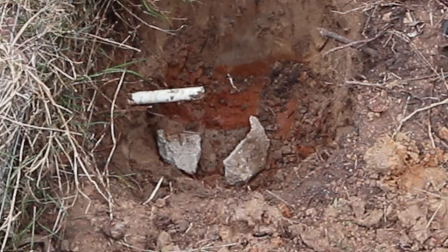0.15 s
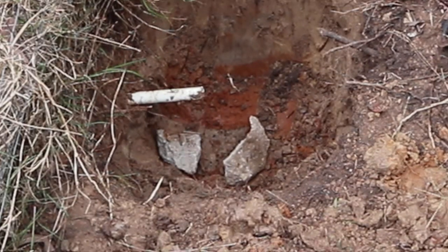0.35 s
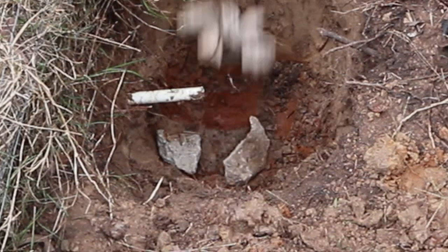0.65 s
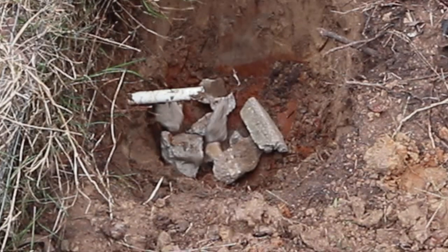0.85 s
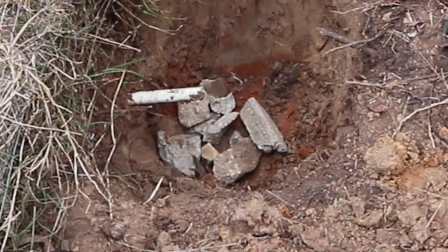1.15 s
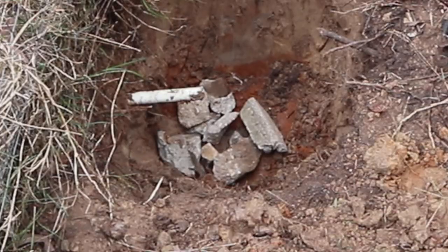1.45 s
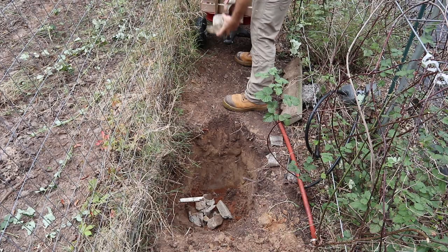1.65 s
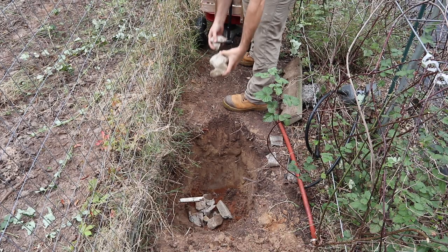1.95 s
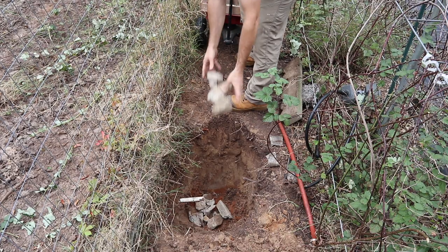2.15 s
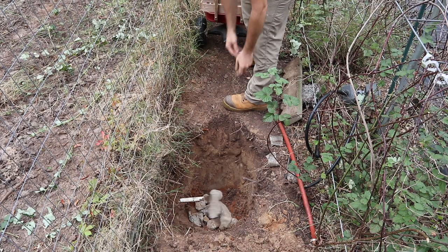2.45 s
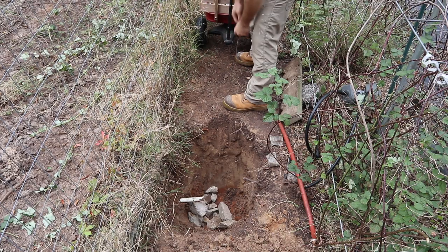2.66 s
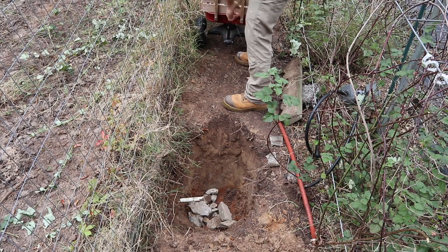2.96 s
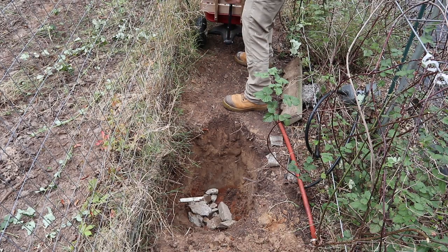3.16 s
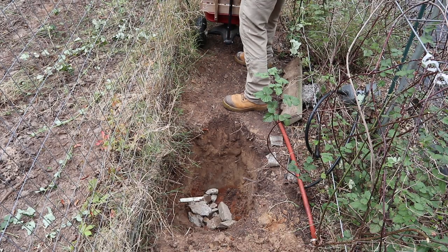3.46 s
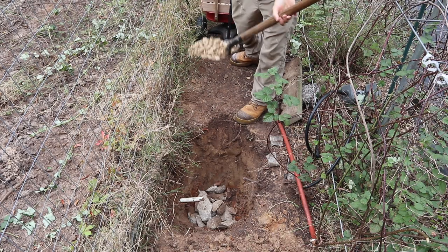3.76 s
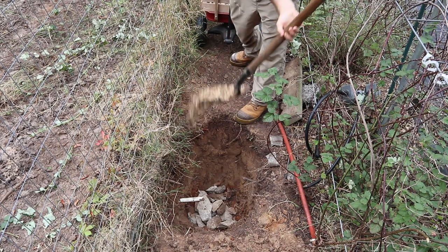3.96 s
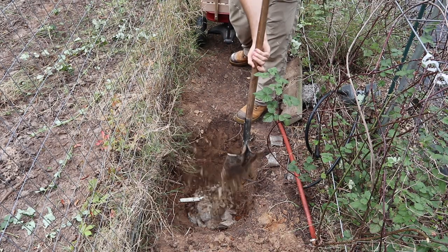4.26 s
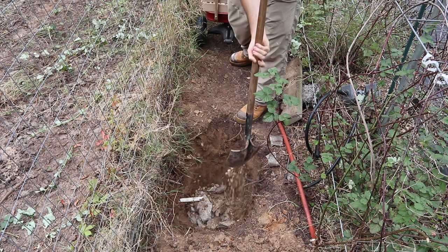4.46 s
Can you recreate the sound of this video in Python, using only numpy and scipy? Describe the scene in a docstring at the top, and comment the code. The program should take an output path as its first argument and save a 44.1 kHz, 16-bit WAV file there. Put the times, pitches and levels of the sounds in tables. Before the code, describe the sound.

Rocks clatter hard into a dug hole in two bursts, then a shovelful of gravel rattles and hisses down, with birds whistling outdoors.

```python
"""Rocks and gravel tipped into a dug hole

Two armfuls of rocks drop on rubble: each blow is shaped noise bursts and pushes, and some stones ring.
A shovel then scoops and tips gravel, made of countless short pebble rings and fine ticks.
Birds whistle in gliding sines with echoes among trees, over a faint hush of filtered noise."""
import sys
import numpy as np
from scipy import signal
from scipy.io import wavfile

SR = 44100
rng = np.random.default_rng(int(sys.argv[2]) if len(sys.argv) > 2 else 0)


def generate_wav(sig):
    """Save sig (samples, or channels by samples) to the path in sys.argv[1] as 16-bit PCM at SR."""
    pcm = np.round(np.clip(np.atleast_2d(sig).T, -1, 1) * 32767).astype(np.int16)
    wavfile.write(sys.argv[1], SR, pcm)


N = 202639
TIME = np.arange(N) / SR

# Resonances of the air in the hole and between the rocks.
# Each row: centre in Hz, level in dB, width in Hz.
HOLE_MODES = [(151, -2, 15), (252, -2.5, 26), (306, -3.5, 61), (430, -8.5, 83), (544, -5.5, 55),
              (696, -5.5, 52), (890, -1, 110), (1190, -11.5, 43), (1440, -10.5, 32), (1720, -8, 47)]
# Tone of fine grit. Each row: frequency in Hz, relative level in dB per Hz.
GRIT_TONE = [(2000, -23.5), (4000, -11.5), (5600, -2.5), (6900, -7), (8500, 3), (10300, -10), (12800, -0.5),
             (16000, -13)]


def amp(db):
    """Decibels to gain."""
    return 10 ** (np.asarray(db) / 20)


def unit(x):
    """Scales to an rms of one."""
    return x / np.sqrt(np.mean(x ** 2) + 1e-20)


def add(mix, s, sound):
    """Mixes a sound in at a time in seconds."""
    part = mix[max(round(s * SR), 0):][:len(sound)]
    part += sound[:len(part)]


def colour(x, points, scale=1, size=4096):
    """Minimum-phase filter through (Hz, dB) points: nothing sounds before a blow."""
    hz, db = np.transpose(points)
    hz = hz * scale
    f = abs(np.fft.fftfreq(size, 1 / SR)) + 1
    # past the outer points the gain falls by 10 dB per octave
    octaves_below = np.maximum(np.log2(hz[0] / f), 0)
    octaves_above = np.maximum(np.log2(f / hz[-1]), 0)
    gain_db = np.interp(np.log(f), np.log(hz), db) - 10 * (octaves_below + octaves_above)
    log_gain = np.log(amp(gain_db))
    # the Hilbert transform of the log gain gives the causal phase
    taps = np.fft.ifft(np.exp(signal.hilbert(log_gain).conj())).real
    return signal.oaconvolve(x, taps[:size // 2])[:len(x)]


def dying(t, t60):
    """Exponential decay that falls by 60 dB in t60 seconds."""
    return np.exp(-np.log(1000) * t / t60)


def struck(x, db, count):
    """Sets the rms of the first count samples of a blow."""
    return amp(db) * x / np.sqrt(np.mean(x[:count] ** 2) + 1e-20)


def swells(rows):
    """Brief bell-shaped rises in level."""
    return sum(amp(db) * np.exp(-((TIME - s) / length) ** 2) for s, db, length in rows)


def hollow(x, modes):
    """What a set of resonances adds to a sound."""
    out = 0
    for hz, db, width in modes:
        out = out + amp(db) * signal.lfilter(*signal.iirpeak(hz, hz / width, fs=SR), x)
    return out


def space(x, t60, gap, tone):
    """Scattered echoes: sparse taps of random sign that start after a gap and die away."""
    t = np.arange(SR) / SR
    signs = rng.choice([-1., 1.], SR)
    taps = signs * (rng.random(SR) < 1 / 10) * (t > gap) * dying(t, t60)
    taps = colour(taps, tone)
    return signal.oaconvolve(x, taps / np.linalg.norm(taps))[:N]


def contact(t, t60, crumble, seat=.0005):
    """Rough faces graze, seat with one hard push, and crunch briefly."""
    crunch = crumble * rng.standard_normal(len(t)) * dying(t, t60) * np.minimum(t / seat, 1)
    push = np.sinc((t - seat) * SR)
    return crunch + push


def blow(clack_db, clack_hz, crack_db, thud_db):
    """A rock's recoil clacks, its edge cracks and the ground thuds."""
    # Tone of the recoil. Each row: multiple of the clack pitch, relative level in dB.
    clack_tone = [(.12, -25.5), (.3, -10), (.55, -2.5), (1, 1), (1.5, -5.5), (2.4, -14.5), (4, -31),
                  (8, -54)]
    # Tone of the breaking edge. Each row: frequency in Hz, relative level in dB per Hz.
    crack_tone = [(2500, -26.5), (4500, -1), (6500, -5), (8500, 2), (10500, -10.5), (13500, -6.5),
                  (16000, -14.5)]
    # Tone of the shaken ground. Each row: frequency in Hz, relative level in dB per Hz.
    thud_tone = [(30, -32), (90, -18.5), (160, -0.5), (240, -2), (330, -2), (480, -14.5), (900, -35)]
    t = np.arange(SR // 6) / SR
    clack = colour(contact(t, t60=.019, crumble=0.21), clack_tone, clack_hz)
    crack = colour(contact(t, t60=0.013, crumble=0.3), crack_tone)
    thud = colour(contact(t, t60=0.053, crumble=0.049), thud_tone)
    # chips and dust patter down after the blow
    chips = rng.standard_normal(len(t)) * (rng.random(len(t)) < 1500 / SR) * dying(t, t60=0.094)
    chips = colour(chips, crack_tone)
    hard = struck(clack, clack_db, count=176) + struck(crack, crack_db, count=176)
    return hard + struck(thud, thud_db - 4.5, count=352) + struck(chips, crack_db - 22.5, count=882)


def ring(modes):
    """The high, short tink of a small solid stone: a few decaying sines."""
    t = np.arange(SR // 6) / SR
    out = np.zeros(len(t))
    for hz, db, t60 in modes:
        out += amp(db) * np.sqrt(2) * np.sin(2 * np.pi * hz * t) * dying(t, t60)
    return out


def knocks():
    """Small stones tumble after each armful, ever more softly: rows for blow() with a start."""
    # The two spells of settling. Each row: start in seconds, length in seconds, first level in dB.
    settling = [(.805, .56, -51.5), (2.527, .2, -46.5)]
    knocks_per_s, fade_db_per_s, centre_hz = 20, 36, 1700
    rows = []
    for start, length, db in settling:
        for k, (when, size, pitch) in enumerate(rng.random((30, 3))):
            age = (k + when) / knocks_per_s
            level = db - fade_db_per_s * age + 8 * (size - .5)
            hz = centre_hz * 2 ** (pitch - .5)
            if age < length:
                rows.append((start + age, level, hz, level - 9, level - 6.5))
    return rows


def pebble_strikes():
    """Pebbles are alike in size, so they clack near one pitch and hardly shake the earth."""
    # Single pebbles hit the blade, each other and the rocks.
    # Each row: start in seconds, clack level in dB, crack level in dB.
    strikes = [(3.708, -40, -31.5), (3.742, -28.5, -33.5), (3.768, -25.5, -38.5), (3.815, -22.5, -42),
               (3.897, -22, -35), (3.901, -28, -40), (3.962, -25, -31), (3.966, -25, -33),
               (3.997, -29, -29.5), (4.014, -21, -23.5), (4.04, -17.5, -18), (4.046, -19.5, -19),
               (4.067, -34, -15.5), (4.087, -20, -20), (4.095, -23.5, -13.5), (4.14, -30.5, -23.5),
               (4.129, -39, -24), (4.188, -37.5, -19), (4.205, -41, -20), (4.214, -40, -25),
               (4.232, -22, -23), (4.257, -26, -15), (4.282, -32, -20), (4.289, -24, -14.5),
               (4.396, -38, -19.5), (4.413, -34, -24), (4.583, -27, -23)]
    centre_hz, spread_octaves = 3400, 0.072
    pitches = centre_hz * 2 ** (spread_octaves * rng.standard_normal(len(strikes)))
    rows = []
    for (s, clack_db, crack_db), hz in zip(strikes, pitches):
        rows.append((s, clack_db, hz, crack_db, clack_db - 29))
    return rows


def rocks():
    """All the blows and rings, with the short answer of the earth walls and a faint one of the trees."""
    # The main blows of rock on rock. Each row: start in seconds, clack level in dB, clack pitch in Hz,
    # crack level in dB, thud level in dB ahead of the 4.5 dB cut in blow().
    main_blows = [(.776, -2, 1590, -7, -18), (.7802, -10.5, 1190, -32, -21),
                  (0.784, -15, 2600, -22.5, -35.5), (0.7916, -16.5, 3210, -18.5, -35),
                  (0.7965, -18.5, 2130, -27, -20.5), (0.8059, -13, 1750, -42, -31.5),
                  (0.8137, -49, 1510, -45, -43), (.8437, -18.5, 2180, -56.5, -55),
                  (.854, -21.5, 1900, -46, -46), (0.8838, -49, 2130, -55, -57), (.906, -38, 1930, -51, -70),
                  (.9128, -49, 2000, -45, -64), (0.939, -31.5, 1740, -57, -58.5),
                  (.961, -36.5, 1224, -61, -60), (.982, -37.5, 2260, -48.5, -62),
                  (1.104, -43, 1300, -58, -52.5), (1.119, -50, 1870, -52, -60.5),
                  (1.183, -35.5, 1850, -50, -48.5), (1.189, -43, 1750, -61, -62),
                  (1.221, -45, 1350, -62, -58), (1.233, -37, 1250, -66, -65),
                  (1.2979, -55.5, 1870, -56.5, -60.5), (2.5044, -12, 1500, -28, -30.5),
                  (2.5101, -11, 2340, -25, -32), (2.5169, -1.5, 1778, -15.5, -19),
                  (2.5212, -9, 1190, -24, -18.5), (2.562, -40, 1730, -56, -44.5),
                  (2.587, -34.5, 2370, -60, -60), (2.612, -31, 1120, -52.5, -39.5),
                  (2.626, -44, 1320, -53.5, -51), (2.693, -47.5, 1137, -60, -72.5),
                  (2.701, -45, 2300, -49.5, -68), (2.839, -53, 1303, -76, -52.5),
                  (2.8589, -31, 1360, -45.5, -51), (2.864, -42.5, 1327, -53, -47.5),
                  (2.915, -56.5, 1320, -72, -60)]
    # Solid stones that ring. Each row: the stone's modes (pitch in Hz, level in dB, t60 in seconds),
    # then its strikes (start in seconds, gain in dB).
    ringing_stones = [([(9110, -2, 0.03), (11900, -11, 0.022), (14220, -11, .018)], [(.7885, -23),
                      (.801, -26), (.8445, -33), (.856, -29.5)]), ([(9150, -4, 0.03), (11790, -7, 0.026),
                      (14220, 3.5, 0.024)], [(1.183, -29.5), (1.233, -52), (1.2985, -55.5)]),
                      ([(8220, -1, 0.017), (8770, -4.5, 0.021), (13200, -8.5, .012)], [(.778, -22),
                      (.7965, -26), (.9395, -38), (.9615, -44), (1.206, -57), (2.5103, -27),
                      (2.5185, -15.5), (2.604, -49), (2.626, -49), (2.692, -49)]), ([(5945, 4, 0.063),
                      (5860, 1, 0.053), (5770, -5, 0.094), (12750, -20, .05)], [(4.214, -17), (4.228, -30),
                      (4.243, -18.5)]), ([(10830, 4, 0.044)], [(4.374, -26), (4.394, -21.5)])]
    # One low push lies beneath the first blow. # Each row: start in seconds, peak level in dB, length in
    # seconds.
    pushes = [(.7778, -19, .001)]
    direct = np.zeros(N)
    for s, *row in main_blows + knocks() + pebble_strikes():
        add(direct, s, blow(*row))
    for modes, hits in ringing_stones:
        for s, db in hits:
            add(direct, s, amp(db) * ring(modes))
    wall_tone = [(120, -0.5), (300, 3.5), (1500, -2.5), (5000, -3.5), (15000, -3)]
    tree_tone = [(150, 0.5), (1800, -4), (6000, -7.5), (15000, -13.5)]
    walls = space(direct, t60=0.048, gap=.003, tone=wall_tone)
    trees = space(direct, t60=0.4, gap=0.013, tone=tree_tone)
    answer = amp(-4.5) * hollow(direct, HOLE_MODES) + amp(-22.0) * walls + amp(-46.5) * trees
    return direct + swells(pushes) + answer


def slides():
    """Stone grinds over stone and soil in a run of tiny slips."""
    # Rocks slide a little as they settle. Each row: centre in seconds, peak level in dB, length in seconds.
    slide_moments = [(.951, -48, 0.0075), (1.018, -59.5, 0.011), (1.15, -56.5, 0.016),
                     (1.205, -56.5, 0.025), (2.568, -46.5, 0.0053), (2.622, -52, 0.021), (2.85, -54, 0.014),
                     (2.895, -58, 0.0079)]
    # Tone of the grinding. Each row: frequency in Hz, relative level in dB per Hz.
    scrape_tone = [(100, -6), (200, 4), (500, -1.5), (900, 3), (1800, -6.5), (4000, -25.5), (8500, -20),
                   (15000, -24.5)]
    slips = rng.standard_normal(N) * (rng.random(N) < 1800 / SR)
    return swells(slide_moments) * unit(colour(slips, scrape_tone))


def grains(per_s, spread_db, lo_hz, hi_hz, cycles, count=36):
    """Countless small collisions, each a brief ring at the pitch of its own pebble."""
    out, t = np.zeros(N), np.arange(SR // 50) / SR
    for hz in np.geomspace(lo_hz, min(hi_hz, SR / 2.2), count):
        sizes = amp(spread_db * np.minimum(rng.exponential(1, N), 3.5)) * rng.choice([-1, 1], N)
        hits = sizes * (rng.random(N) < per_s / count / SR)
        # each ring falls by 60 dB within the given number of cycles
        ping = np.sin(2 * np.pi * hz * t) * dying(t, cycles / hz)
        out += np.sqrt(hz) * signal.oaconvolve(hits, unit(ping))[:N]
    return out


def clumps(per_s, t60, depth):
    """Stones collide in little bunches: the level jumps at random moments and dies quickly."""
    jumps = rng.exponential(1, N) * (rng.random(N) < per_s / SR)
    decay = dying(np.arange(SR // 20) / SR, t60)
    return unit(1 + depth * signal.oaconvolve(np.minimum(jumps, 3), decay)[:N])


def gravel():
    """Pebbles clack, grit sizzles and the ground rumbles as the load is scooped and poured."""
    # Flow of the gravel as it is scooped, tossed and lands. Each row: time in seconds, then levels in dB
    # of pebbles, grit and shaken earth, ahead of small trims.
    flow = [(3.6, -67.5, -67.5, -66), (3.718, -37.5, -46.5, -59), (3.81, -29.0, -33.5, -56),
            (3.92, -34, -39, -58.0), (3.995, -43.5, -40, -59), (4.022, -29.5, -28.5, -38.5),
            (4.09, -33.5, -28, -40), (4.115, -51, -24.5, -55), (4.146, -39.5, -23, -53.0),
            (4.187, -45, -32.0, -54), (4.215, -33.5, -15.5, -48), (4.294, -26, -19.0, -52),
            (4.311, -32.5, -22, -52.5), (4.52, -40, -20.5, -51.0), (4.551, -47.5, -29, -62),
            (4.59, -35, -22, -52)]
    # The load leaves the blade: start and end in seconds.
    pour = (3.87, 4.19)
    # Tone of the pebbles. Each row: frequency in Hz, relative level in dB per Hz.
    pebble_tone = [(250, -24), (600, -10), (1000, -5.5), (2200, -1.5), (3500, -0.5), (5000, -2.5),
                   (8000, -23)]
    # Tone of the shaken earth. Each row: frequency in Hz, relative level in dB per Hz.
    earth_tone = [(40, -30.5), (80, -14.5), (140, -2.5), (300, 0), (550, -1.5), (1000, -10)]
    # Grit heard through the heap. Each row: frequency in Hz, gain in dB.
    buried_tone = [(3000, 3), (6000, 4), (9000, -3), (11000, -5.5), (16000, -10.5)]
    # Resonances of the loaded blade. Each row: centre in Hz, level in dB, width in Hz.
    blade_modes = [(635, -1, 70), (1110, 0.5, 96), (1850, 0, 270), (2420, -3.5, 220), (4763, -7.5, 1890)]
    s, *levels = np.transpose(flow)
    pebble_db, grit_db, earth_db = (np.interp(TIME, s, level, left=-120) for level in levels)
    free = np.interp(TIME, pour, (0, 1))

    small = unit(grains(per_s=2700, spread_db=3.5, lo_hz=467.5, hi_hz=7300, cycles=6))
    # larger pebbles knock with long rings at their own pitch
    large = unit(grains(per_s=470, spread_db=2.0, lo_hz=840, hi_hz=2966, cycles=59))
    pebbles = colour(small + amp(-5.0) * large, pebble_tone)
    # the pebbles sound through the blade, then in the hole
    on_blade = amp(-3.5) * pebbles + hollow(pebbles, blade_modes)
    in_hole = pebbles + amp(-3.0) * hollow(pebbles, HOLE_MODES)
    pebbles = free * unit(in_hole) + (1 - free) * unit(on_blade)

    grit = colour(grains(per_s=5700, spread_db=3.0, lo_hz=2900, hi_hz=15500, cycles=14), GRIT_TONE)
    tick_sizes = amp(4.6 * np.minimum(rng.exponential(1, N), 3))
    ticks = colour(tick_sizes * (rng.random(N) < 450 / SR), GRIT_TONE)
    fine = amp(-2.5) * unit(grit) + amp(-9.0) * unit(ticks)
    # grit is muffled inside the heap and bright once it flies free
    fine = free * fine + (1 - free) * colour(fine, buried_tone)

    earth = unit(colour(rng.standard_normal(N), earth_tone))
    bunched = clumps(per_s=200, t60=0.014, depth=0.37)
    pebbles = amp(pebble_db + 0.17) * pebbles * bunched
    fine = amp(grit_db + 0.53) * fine * unit(bunched ** 0.52)  # grit bunches less
    return pebbles + fine + amp(earth_db + 0.3) * earth


def steps():
    """Dull thumps of a boot: a soft contact coloured by packed soil."""
    # A boot comes down, heel then sole. Each row: start in seconds, level in dB.
    footfalls = [(4.025, -44.5), (4.093, -44.5)]
    # Tone of the boot on soil. Each row: frequency in Hz, relative level in dB per Hz.
    boot_tone = [(30, -11), (70, -11), (130, 5.5), (200, -23), (400, -4), (1000, -44)]
    out, t = np.zeros(N), np.arange(SR // 6) / SR
    for s, db in footfalls:
        thump = colour(contact(t, t60=0.041, crumble=0.019), boot_tone)
        add(out, s, struck(thump, db, count=600))
    return out


def whistles(syllables):
    """Nearly pure notes that swell and fade along a curved glide; those within the trill warble."""
    # The warble: start and end in seconds, rate per second, depth in Hz.
    trill = (2.16, 2.243, 72, 190)
    out, (start, stop, per_s, depth_hz) = np.zeros(N), trill
    for s, length, first, middle, last, db in syllables:
        u = np.linspace(0, 1, round(length * SR))
        t = s + u * length
        pitch = np.polyval(np.polyfit([0, .5, 1], [first, middle, last], 2), u)
        pitch += depth_hz * np.sin(2 * np.pi * per_s * (t - start)) * (t > start) * (t < stop)
        note = np.sqrt(2) * np.sin(2 * np.pi * np.cumsum(pitch) / SR)
        arch = abs(np.sin(np.pi * u)) ** 0.88  # a slightly broadened half sine
        add(out, s, amp(db) * arch * note)
    return out


def birds():
    """A near song, low coos and far calls, the song and far calls echoing among the trees."""
    # Syllables of the near song, each one glide. Each row: start in seconds, length in seconds,
    # first, middle and last pitch in Hz, level in dB ahead of the mix gains below.
    song_syllables = [(0, 0.057, 3930, 3660, 3550, -56), (.066, 0.032, 3850, 3010, 2530, -45),
                      (.105, 0.055, 1790, 1910, 2120, -45.5), (.118, .03, 3450, 3050, 2700, -57),
                      (.158, 0.026, 2500, 2200, 1870, -43), (.333, 0.04, 4000, 3320, 2522, -41.5),
                      (.378, 0.047, 1766, 1756, 2100, -50), (.412, 0.031, 2700, 2140, 1930, -42),
                      (.57, 0.027, 3800, 3500, 2930, -61), (.604, 0.029, 2940, 1980, 1710, -45.5),
                      (.648, 0.033, 1980, 1776, 1720, -50.5), (.736, .052, 1970, 2320, 2080, -41.5),
                      (1.085, 0.056, 1885, 2600, 1720, -56.5), (1.165, 0.07, 2550, 2410, 1680, -57),
                      (1.45, 0.077, 1883, 2260, 1527, -49.5), (1.545, 0.086, 1738, 2060, 1570, -57),
                      (1.757, 0.032, 1650, 1895, 2430, -46), (1.783, 0.0256, 2550, 2970, 3260, -52),
                      (1.79, 0.046, 1465, 1637, 1440, -53.5), (1.89, 0.067, 2270, 2225, 2080, -57.5),
                      (2.048, 0.028, 1420, 1500, 1620, -52), (2.05, 0.024, 3050, 3100, 3280, -54),
                      (2.066, .014, 1650, 2250, 2340, -41.5), (2.08, 0.039, 2420, 3040, 2945, -53),
                      (2.086, .036, 1500, 1527, 1500, -52.5), (2.15, 0.095, 2430, 2526, 2380, -49),
                      (2.235, 0.031, 2486, 2200, 1830, -46)]
    # Calls of far birds, heard mostly as echo. Each row: start in seconds, length in seconds,
    # first, middle and last pitch in Hz, level in dB ahead of the mix gains below.
    far_calls = [(1.275, .04, 6730, 6730, 6650, -64.5), (1.6, 0.58, 1380, 1409, 1360, -66),
                 (1.85, 0.13, 1169, 1089, 1053, -57), (1.975, .028, 6900, 6820, 6710, -53.5),
                 (2.736, .022, 3150, 2370, 1500, -58), (3.096, .02, 3630, 2093, 1390, -51),
                 (3.255, 0.026, 2880, 1900, 1450, -55.5)]
    # Soft low coos. Each row: start in seconds, length in seconds,
    # first, middle and last pitch in Hz, level in dB.
    coos = [(.295, 0.14, 657, 755, 780, -59.5), (.385, 0.16, 778, 730, 650, -61),
            (1.985, .15, 704, 753, 635, -60.5)]
    near, far = whistles(song_syllables), whistles(far_calls)
    leaves = [(700, -9), (1500, -1), (3000, -2), (9000, -0.5), (16000, -4.0)]
    slap = np.zeros(N)
    add(slap, .05, near)  # one clear echo off the slope
    near_echo = space(near, t60=0.39, gap=0.0095, tone=leaves)
    far_echo = space(far, t60=.58, gap=0.0089, tone=leaves)
    song = amp(-2) * near + amp(-19) * slap + amp(-11.5) * near_echo
    return song + whistles(coos) + amp(-8) * far + amp(-5.5) * far_echo


def hush():
    """Faint air and leaves as filtered noise whose level dips at set times, with a few dry rustles."""
    # The hush sinks, then creeps back. Each row: start in seconds, end in seconds, depth in dB.
    dips = [(.775, 1.63, 13.5), (2.502, 4.22, 13.5), (4.222, 4.7, 16)]
    # Tone of the hush. Each row: frequency in Hz, relative level in dB per Hz.
    hush_tone = [(25, -4), (60, -0.5), (130, -0.5), (250, -3), (500, -5.5), (700, -5), (1200, -8.5),
                 (1700, -8.5), (2500, -11.5), (5700, -14.5), (8200, -14.5), (11000, -18), (16000, -20)]
    # Dry rustles of grit and grass. Each row: centre in seconds, peak level in dB, length in seconds.
    rustles = [(.41, -58, 0.028), (.422, -44, 0.0033), (.507, -50.5, .004), (.536, -46.5, 0.0025),
               (.706, -53, 0.0055), (1.904, -53.5, 0.024), (2.166, -58.5, 0.044)]
    sink_s, creep_db_per_s = .035, 5.5
    level_db = np.full(N, -55.0)
    for start, stop, depth_db in dips:
        age = TIME - start
        remaining_db = np.maximum(depth_db - creep_db_per_s * age, 0)
        level_db -= np.clip(age / sink_s, 0, 1) * remaining_db * (TIME < stop)
    air = amp(level_db) * unit(colour(rng.standard_normal(N), hush_tone))
    crackle = grains(per_s=2000, spread_db=3.5, lo_hz=2497, hi_hz=14790, cycles=4.4, count=10)
    return air + swells(rustles) * unit(colour(crackle, GRIT_TONE))


def scene():
    """Everything, summed to one channel."""
    return (rocks() + slides() + gravel() + steps() + birds() + hush())[None]


def record(dry):
    """Peaks past full scale clip flat, then a steep low-pass limits the band."""
    edge_hz = 16250
    clipped = np.clip(dry, -1, 1)
    lowpass = signal.firwin(511, edge_hz, window=("kaiser", 9), fs=SR)
    return signal.oaconvolve(clipped, lowpass[None], "same")


dry = scene()
out = record(dry)
generate_wav(out)
```